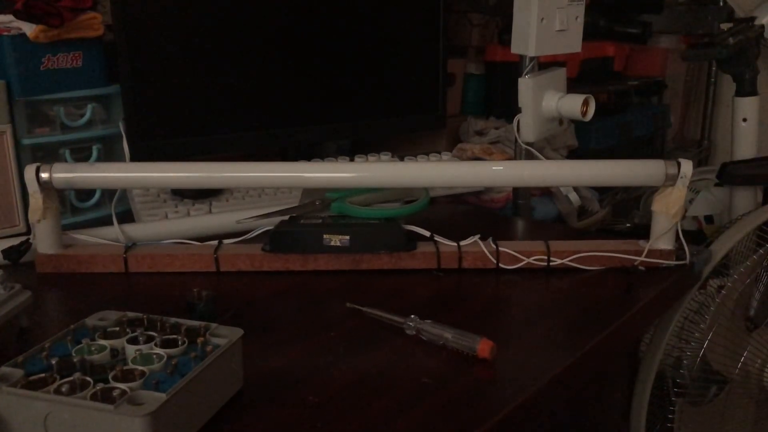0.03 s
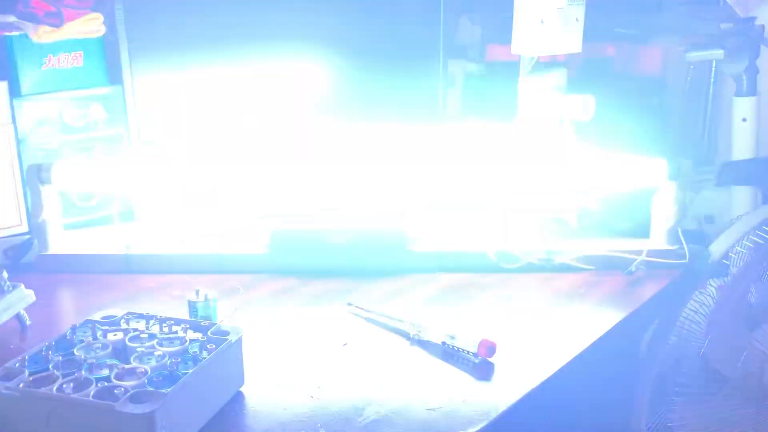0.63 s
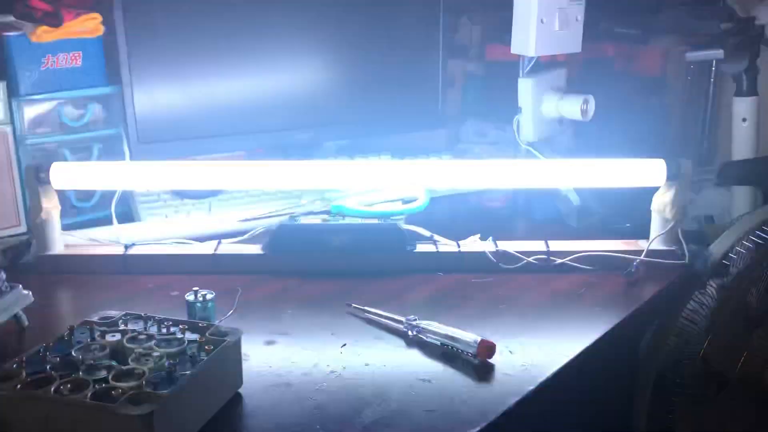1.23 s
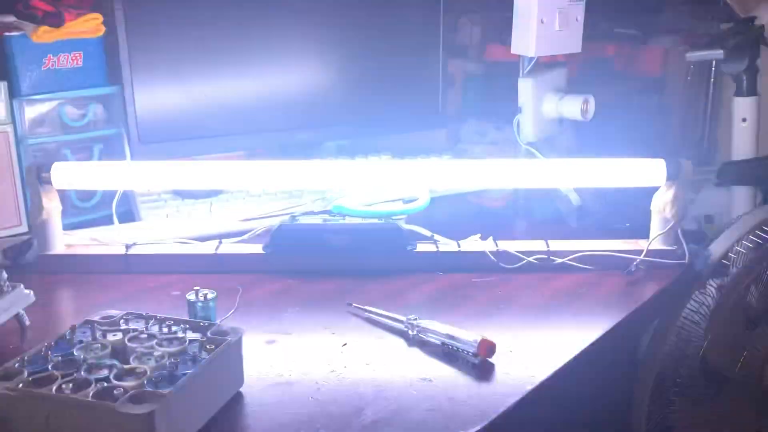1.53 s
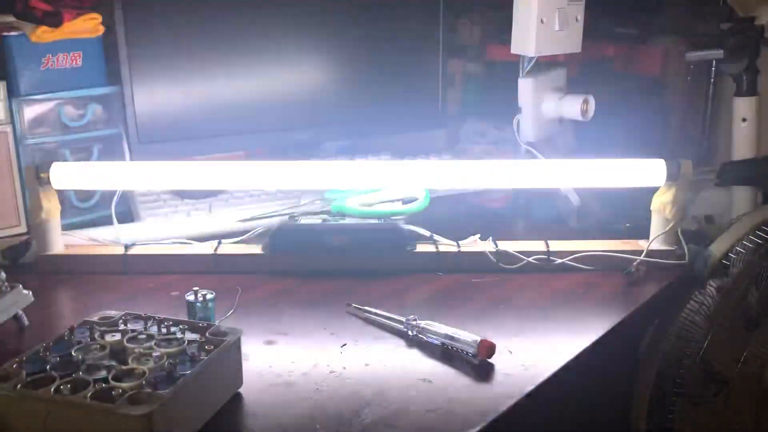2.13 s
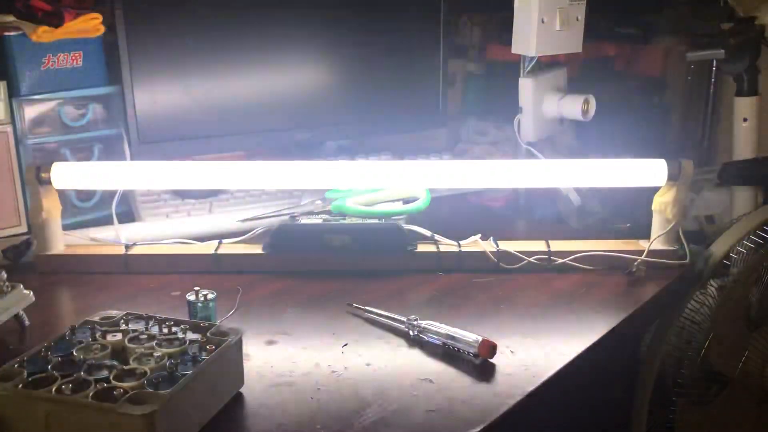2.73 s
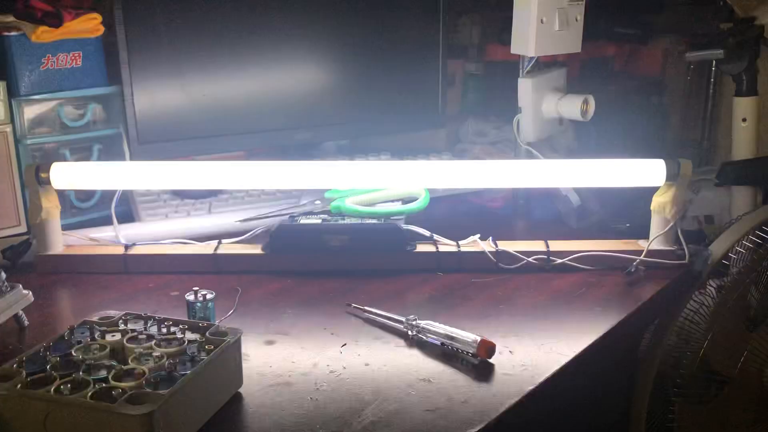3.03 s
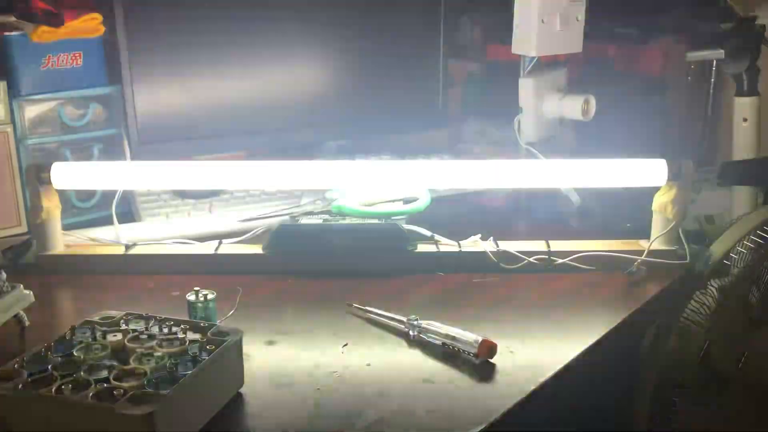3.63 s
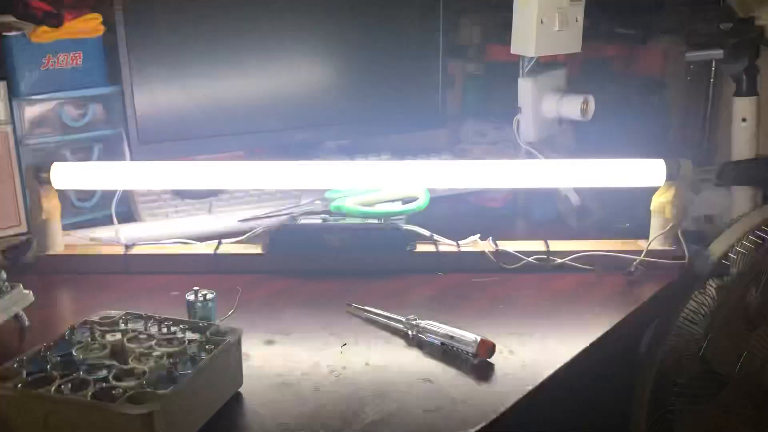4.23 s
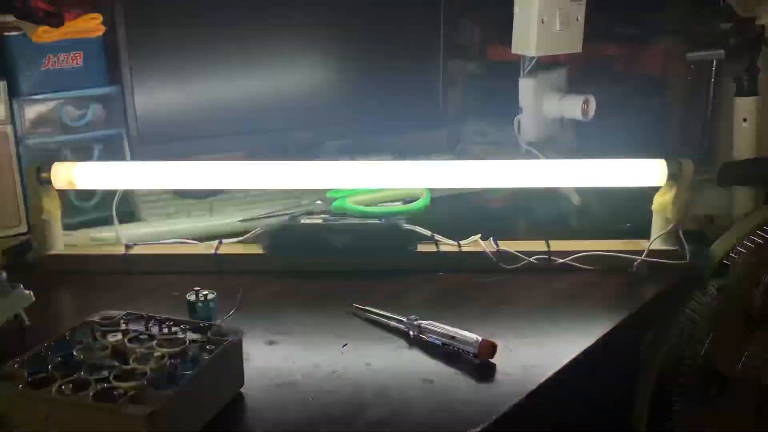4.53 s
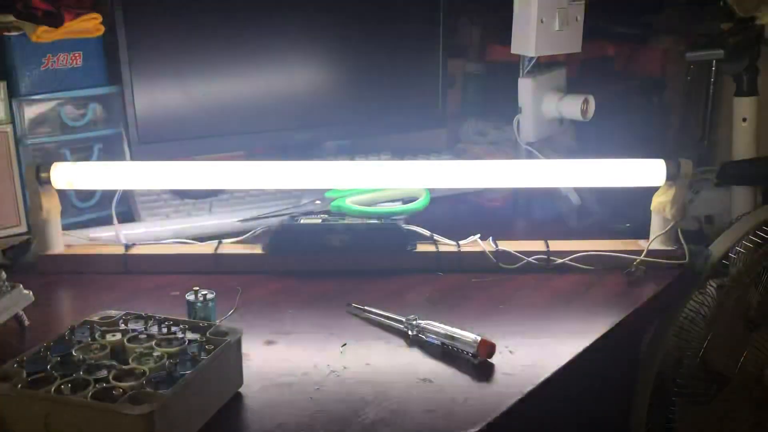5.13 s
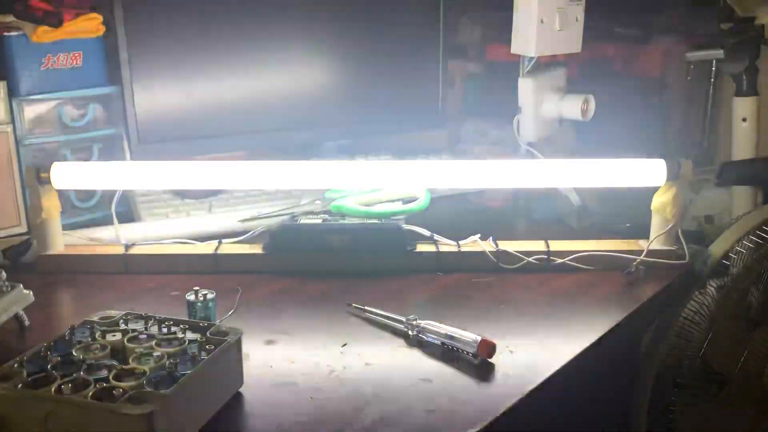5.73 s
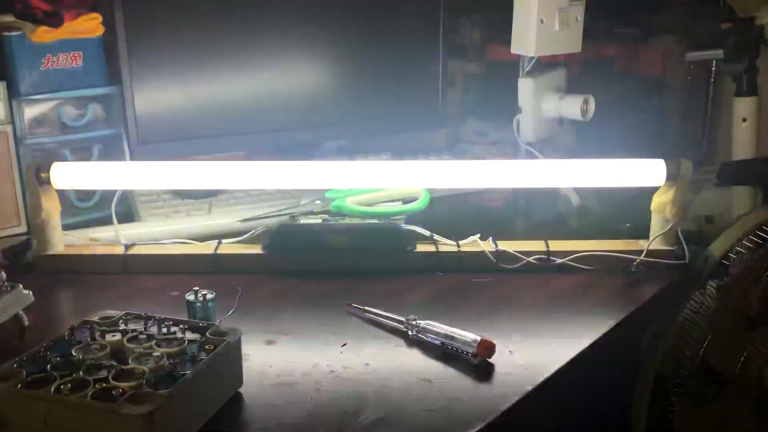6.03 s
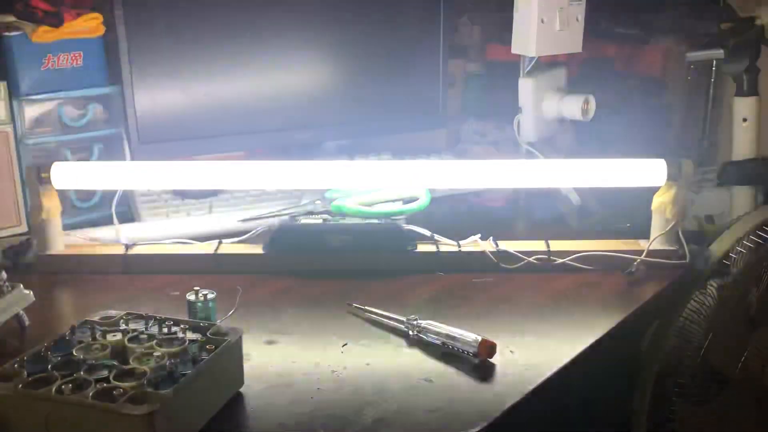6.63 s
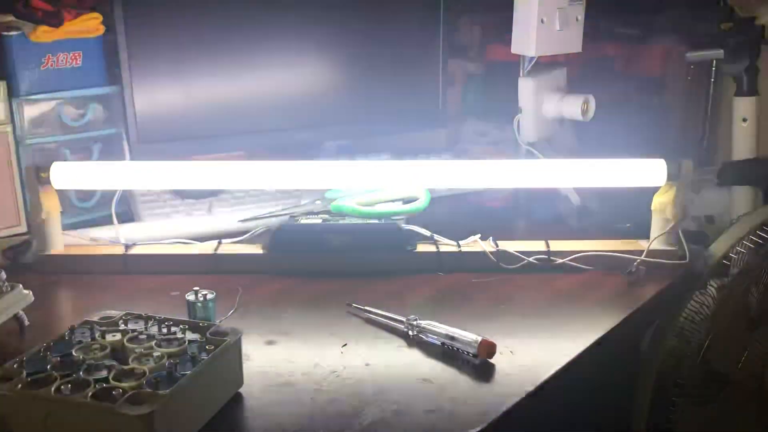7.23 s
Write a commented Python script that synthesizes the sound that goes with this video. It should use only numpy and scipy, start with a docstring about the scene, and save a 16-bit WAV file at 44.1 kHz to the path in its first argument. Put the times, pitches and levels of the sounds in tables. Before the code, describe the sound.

One sharp, ringing electric pop in a small room, followed by a fluorescent tube's faint crackly buzz and steady fan hum.

```python
"""A fluorescent tube on a workbench lights with one sharp electric pop that rings round a small hard room.
Then it buzzes: tiny sparks crowd into every half cycle of the mains power and make the glass and the
fitting ring. Underneath, two fan motors hum over a steady rush of air. They turn at almost the same
speed, so their hum slowly swells and fades (it "beats")."""
import sys
import numpy as np
from scipy import signal
from scipy.fft import rfft, irfft
from scipy.io import wavfile
from scipy.ndimage import uniform_filter1d

SR = 44100
rng = np.random.default_rng(int(sys.argv[2]) if len(sys.argv) > 2 else 0)


def output_pcm(signal):
    """Save a mono or channel-first signal as 16-bit PCM at the path in sys.argv[1].

    Samples are clipped to [-1, 1] before scaling.
    """
    pcm = np.clip(np.atleast_2d(signal).T, -1, 1) * 32767
    wavfile.write(sys.argv[1], SR, np.round(pcm).astype(np.int16))


N = 325899
MAINS_HZ = 49.98
POP_S = 0.4794  # the moment the tube lights


def undb(db):
    """Turn decibels (dB) into a number to multiply by."""
    return 10 ** (np.asarray(db) / 20)


def level(x, db):
    """Scale a sound to an average (rms) level in dB."""
    return x * undb(db) / np.sqrt(np.mean(x ** 2))


def at(table, hz):
    """Look up a frequency in rows of (Hz, value), blending between rows on a scale of octaves."""
    row_hz, value = np.transpose(table)
    return np.interp(np.log(np.maximum(hz, 1)), np.log(row_hz), value)


def noise(colour):
    """Noise at 0 dB, its bass and treble shaped by rows of (Hz, dB)."""
    gain = undb(at(colour, np.arange(N // 2 + 1) * SR / N))
    return level(irfft(rfft(rng.standard_normal(N)) * gain, N), 0)


def drift(per_s):
    """A smooth random wobble, about 1 in size, with per_s new values a second."""
    hold = int(SR / per_s)
    steps = np.repeat(rng.standard_normal(N // hold + 1), hold)
    return 1.4 * uniform_filter1d(uniform_filter1d(steps, hold), hold)[:N]


def fade(age, t60):
    """Silent before age 0, then dying away. The fade time t60 is the seconds it takes to drop 60 dB."""
    return (age >= 0) * np.exp(-np.log(1000) * np.maximum(age, 0) / t60)


def spells(t, rows, edge_s):
    """Extra dB for louder spells: each rises over edge_s seconds, holds, and falls again."""
    return sum(db * np.clip(.5 + np.minimum(t - start, start + length - t) / edge_s, 0, 1)
               for start, length, db in rows)


def high_pass(x, hz):
    """Turn down everything below hz."""
    return signal.sosfilt(signal.butter(2, hz, "high", fs=SR, output="sos"), x)


def resonate(x, modes, direct_db):
    """Make a sound ring at rows of (Hz, width in Hz, dB); a little passes straight through."""
    f = np.arange(1, N // 2 + 2) * SR / N
    response = sum(undb(db) / (1 + 1j * (f / hz - hz / f) * hz / width) for hz, width, db in modes)
    return irfft(rfft(x) * (response + undb(direct_db)), N)


def fans(t, shaft_hz=48.44, beat_s=3.28, wander=0.14, air_db=-53.0):
    """Iron cores hum, air rushes, and two motors beat against each other, faster on their higher tones."""
    # Each row: multiple of the mains frequency, level in dB.
    iron_tones = [(2, -67), (4, -70), (5, -70)]
    # Each row: multiple of the shaft speed, level of the faster motor in dB, level of the slower one
    # in dB, a time in seconds when the two are in step.
    motor_tones = [(1, -56.7, -57, 3.76), (2, -66, -69, 2.6), (4, -59, -62.5, 3.46), (5, -57.6, -68, 1.9),
                   (7, -73, -78, 1.4), (8, -65.5, -70, 3.3), (9, -72, -78, 3.7), (17, -77, -78, 2.5),
                   (18, -77, -80, 3.2)]
    # Each row: frequency in Hz, relative level of the rushing air in dB.
    air_colour = [(20, -28), (45, -17), (75, -7), (135, 0.5), (165, -3), (260, -2), (450, -6), (650, -8),
                  (850, -9), (1400, -13), (2000, -18), (2500, -23.5), (3500, -26.5), (7500, -40.5),
                  (16000, -46)]
    hum = sum(level(np.sin(2 * np.pi * k * MAINS_HZ * t), db) for k, db in iron_tones)
    for k, faster_db, slower_db, in_step_s in motor_tones:
        draught = min(k - 1, 1)  # only the higher tones waver in the draught; the shaft turns evenly
        since = t - in_step_s
        phase = 2 * np.pi * k * shaft_hz * since + draught * wander * drift(7.4)
        lag = 2 * np.pi * k * since / beat_s
        pair = level(np.cos(phase), faster_db) + level(np.cos(phase - lag), slower_db)
        hum = hum + pair * undb(draught * drift(6))
    return hum + noise(air_colour) * undb(air_db + 0.55 * drift(3.8))


def room_echo(age):
    """The room answers the pop: its echoes blur into noise that lasts longest near 2000 Hz."""
    # Each row: frequency in Hz, relative level of the echo in dB.
    echo_colour = [(300, -40), (800, -25.5), (1200, -14), (1500, -9.5), (1750, -3.5), (2100, -3),
                   (2300, -6.5), (2700, -6.5), (3100, -9.5), (4100, -14.5), (5300, -9.5), (7700, -12),
                   (9200, -15), (15500, -22)]
    # Each row: frequency in Hz, fade time of the room in seconds.
    fade_times = [(1000, 0.37), (2000, 0.69), (4000, 0.56), (6000, 0.53), (8000, 0.47), (11000, 0.33),
                  (16000, 0.34)]
    spectrum = rfft(noise(echo_colour))
    freqs = np.arange(len(spectrum)) * SR / N
    band = np.round(3 * np.log2(np.maximum(freqs, 1000) / 1000))  # three bands to an octave
    centres = 1000 * 2 ** (np.arange(band.max() + 1) / 3)
    return sum(irfft(spectrum * (band == k), N) * fade(age, at(fade_times, hz))
               for k, hz in enumerate(centres))


def in_room(x, t, echo_db=-5, t60=0.29):
    """Add a short wash of echoes that fills the gaps between bursts, then set the level to 0 dB."""
    room = rng.standard_normal(SR) * fade(t[:SR], t60)
    wash = signal.fftconvolve(x, room / np.linalg.norm(room))[:N]
    return level(x + undb(echo_db) * wash, 0)


def pop(t, ring_hz=1900, ring_rise_s=0.00097, crack_t60=0.0091, echo_db=-23.0, tones_db=-39):
    """A spark cracks and makes its housing ring; nearby surfaces repeat it, then the room answers."""
    # The direct crack, then its bounces off the bench and near walls.
    # Each row: delay in seconds, crack level in dB, ring level in dB.
    arrivals = [(0.0002, -19, -9), (0.0033, -13.5, -28), (0.0050, -19, -27), (0.0076, -33, -14.5),
                (0.0400, -30, -19)]
    # Each row: frequency in Hz, relative level of the crack in dB.
    crack_colour = [(300, -42), (900, -46), (2000, 3), (3500, 3.5), (5500, -10), (7700, 6.5), (9200, -9),
                    (10000, -2), (11000, -16), (16000, 1)]
    # Tones left ringing. Each row: frequency in Hz, relative level in dB, fade time in seconds.
    ringing_tones = [(1690, -4, .45), (1721, -5, .45), (1879, 0, .42), (1976, 0, .45), (2032, 0, .5),
                     (2097, 0, .55), (2152, -3, .45), (2520, -5, .4), (2569, -6, .42), (2754, -5, .42),
                     (2808, -6, .42), (3589, -10, .45), (4667, -11, .33), (5150, -8, .4), (5233, -8, .4),
                     (5542, -8, .4), (6158, -10, .33), (7354, -8, .37), (7700, -9, .38)]
    age, out = t - POP_S, 0
    crack = noise(crack_colour)
    for delay, crack_db, ring_db in arrivals:
        since = np.maximum(age - delay, 0)
        swell = (since / ring_rise_s) ** 2 * np.exp(2 - 2 * since / ring_rise_s)
        ring = undb(ring_db) * swell * np.sin(2 * np.pi * ring_hz * since)
        out = out + ring + undb(crack_db) * crack * fade(age - delay, crack_t60)
    tones = sum(undb(db) * fade(age, t60) * np.sin(2 * np.pi * (hz * age + rng.random()))
                for hz, db, t60 in ringing_tones)
    build_up = np.clip(age / 0.0014, 0, 1)
    tail = build_up * (undb(echo_db) * room_echo(age) + undb(tones_db) * tones)
    return high_pass(out + tail, 870)  # so small a source gives off no bass


def sparks(t, peak_per_s, burst_t60, burst_spread, spark_spread, lead=0.27, jitter=.07):
    """Tiny sparks start near each voltage peak and thin out; each burst has its own start and strength."""
    half_cycles = 2 * MAINS_HZ * t + lead
    burst = half_cycles.astype(int)
    shift, strength, size = np.clip(rng.standard_normal((3, N)), -2, 2)
    age = (half_cycles + jitter * shift[burst]) % 1 / (2 * MAINS_HZ)
    fires = rng.random(N) < peak_per_s / SR * fade(age, burst_t60)
    direction = (-1.) ** burst
    return fires * direction * np.exp(burst_spread * strength[burst] + spark_spread * size)


def spot_db(t, growth):
    """Level of one sparking spot: it creeps up after the pop and rises when the whole tube surges."""
    # Each row: start in seconds, length in seconds, size of the surge in dB.
    surges = [(4.27, .56, 3.5), (4.9, 0.38, 1.8), (5.63, 1.8, 4)]
    start_db, db_per_s, surge_share = growth
    return start_db + db_per_s * (t - POP_S) + surge_share * spells(t, surges, edge_s=.06)


def buzz(t, hiss_db=-75):
    """Three sparking spots ring the tube: a coarse crackle, uneven spitting and a fine, flaring sizzle."""
    # Where each spot makes the glass and fitting ring.
    # Each row: frequency in Hz, width in Hz, relative level in dB.
    crackle_modes = [(6140, 200, 2), (9090, 93, 1), (10580, 330, 1), (10805, 560, -1.5), (11580, 530, 0.5),
                     (12000, 400, -13), (14700, 1100, -17)]
    spit_modes = [(5650, 210, -4), (6290, 240, 0.5), (6870, 190, 5), (8380, 220, -0.5), (8640, 140, -15),
                  (10500, 280, -6), (14500, 980, -20)]
    sizzle_modes = [(6950, 120, -5), (9175, 60, 1), (12910, 45, 4), (13990, 250, 0), (14200, 100, -2),
                    (14620, 250, -1), (15100, 250, -1), (15600, 300, -2)]
    # Each holds: starting level in dB, rise in dB per second, share of a surge that the spot follows.
    crackle_growth = (-70, 0.32, 0.38)
    spit_growth = (-74, .15, 1)
    sizzle_growth = (-74, 0.42, .6)
    # Flare-ups of the sizzle alone. Each row: start in seconds, length in seconds, rise in dB.
    flares = [(.77, .1, 7), (.89, .15, 9), (1.22, .06, 9), (1.47, 0.32, 9), (3.52, .17, 3), (3.76, .26, 2)]
    crackle = sparks(t, peak_per_s=1500, burst_t60=.016, burst_spread=.1, spark_spread=.59)
    crackle = resonate(crackle, crackle_modes, direct_db=-21)
    spit = sparks(t, peak_per_s=4000, burst_t60=.012, burst_spread=.45, spark_spread=.39)
    spit = resonate(spit, spit_modes, direct_db=-17.5)
    sizzle = sparks(t, peak_per_s=5000, burst_t60=.015, burst_spread=.35, spark_spread=.3)
    sizzle = resonate(sizzle, sizzle_modes, direct_db=-28)
    flare_db = spells(t, flares, edge_s=.03)
    flicker_db = 1.2 * drift(14)  # the sizzle never holds quite still
    out = in_room(crackle, t) * undb(spot_db(t, crackle_growth))
    out += in_room(spit, t) * undb(spot_db(t, spit_growth))
    out += in_room(sizzle, t) * undb(spot_db(t, sizzle_growth) + flare_db + flicker_db)
    out += undb(hiss_db) * rng.standard_normal(N)  # countless sparks too small to hear singly
    return high_pass(out * (t > POP_S), 3000)


def scene():
    """The pop, the buzz and the fans, mixed into one channel."""
    t = np.arange(N) / SR
    return (pop(t) + buzz(t) + fans(t))[None]


def record(dry):
    """Cut the very highest treble, above 15750 Hz."""
    return signal.sosfilt(signal.ellip(10, .2, 80, 15750, fs=SR, output="sos"), dry)


dry = scene()
out = record(dry)
output_pcm(out)
```